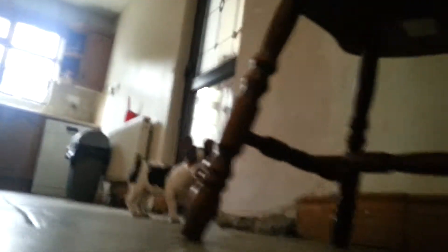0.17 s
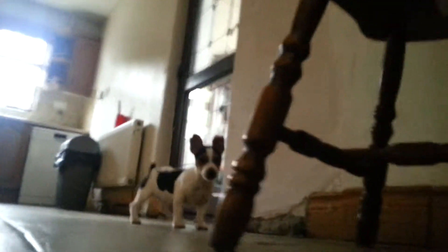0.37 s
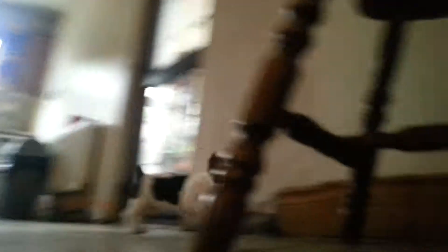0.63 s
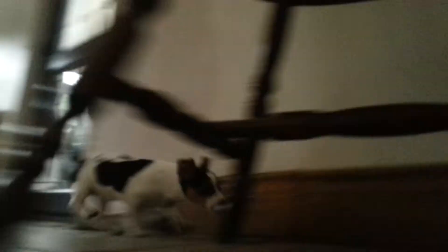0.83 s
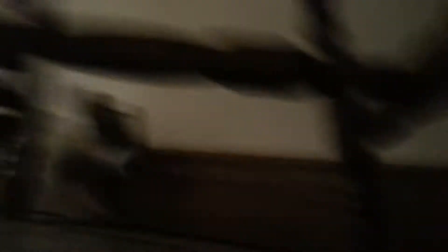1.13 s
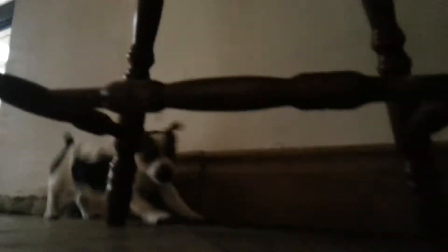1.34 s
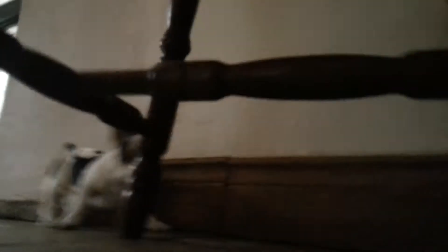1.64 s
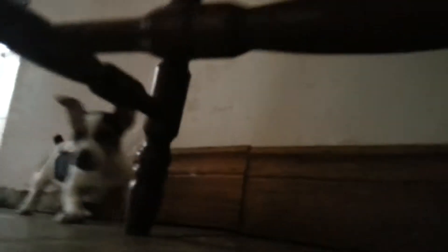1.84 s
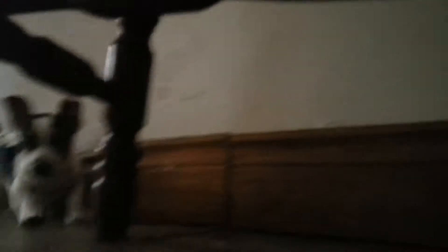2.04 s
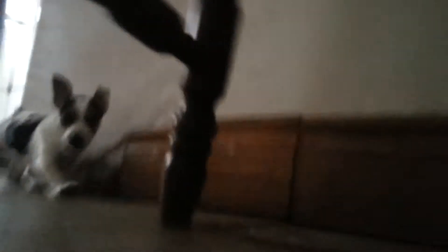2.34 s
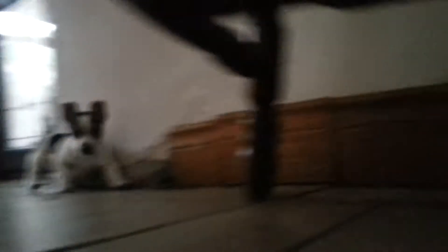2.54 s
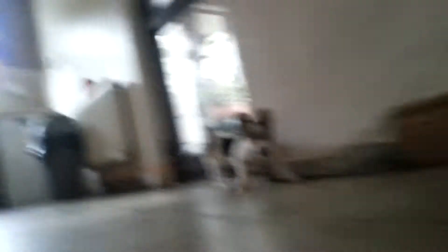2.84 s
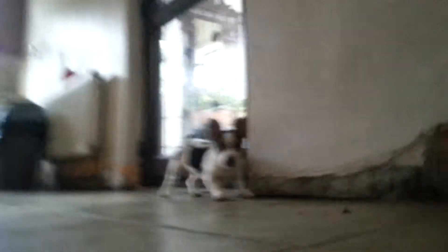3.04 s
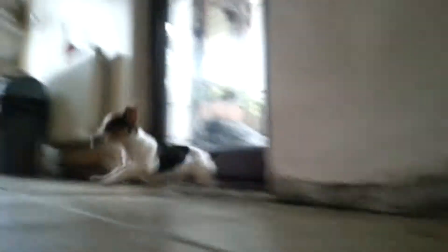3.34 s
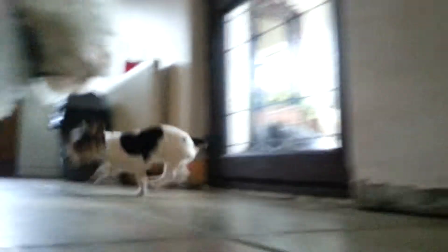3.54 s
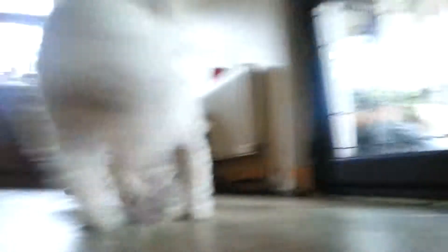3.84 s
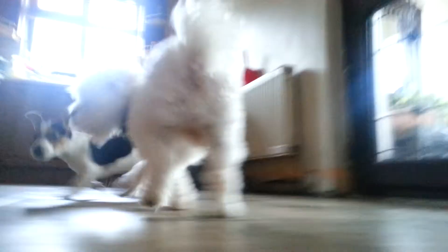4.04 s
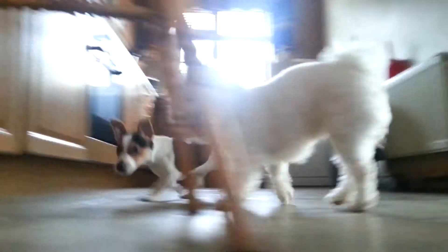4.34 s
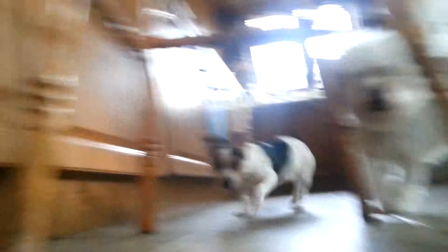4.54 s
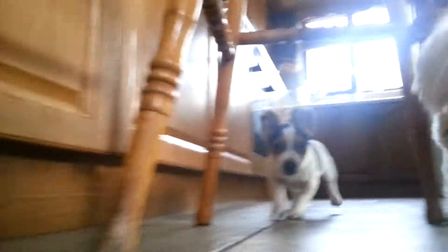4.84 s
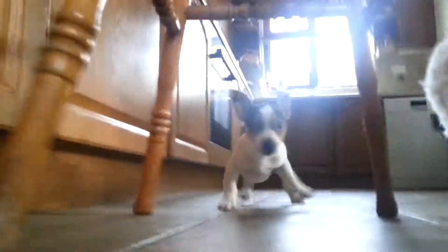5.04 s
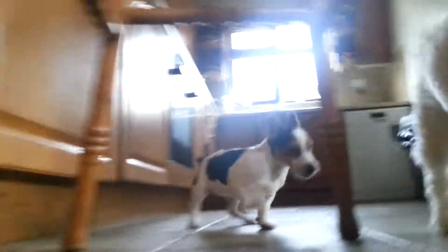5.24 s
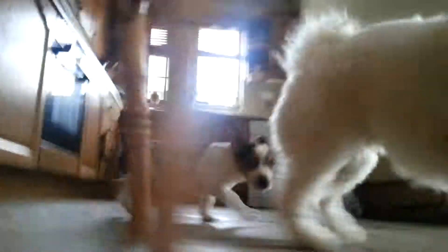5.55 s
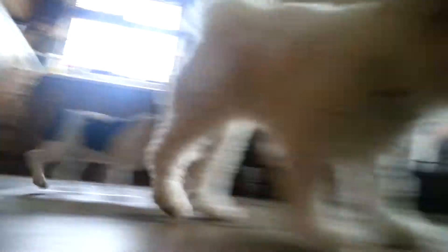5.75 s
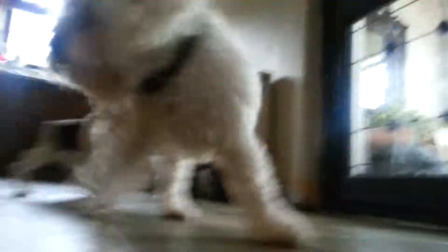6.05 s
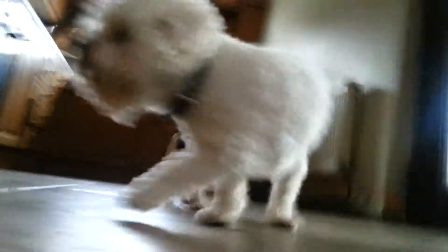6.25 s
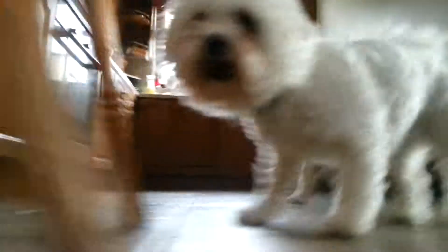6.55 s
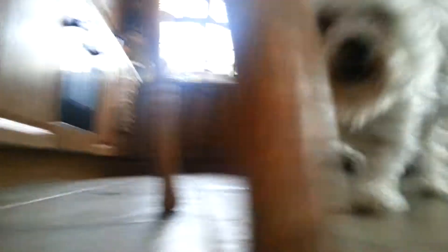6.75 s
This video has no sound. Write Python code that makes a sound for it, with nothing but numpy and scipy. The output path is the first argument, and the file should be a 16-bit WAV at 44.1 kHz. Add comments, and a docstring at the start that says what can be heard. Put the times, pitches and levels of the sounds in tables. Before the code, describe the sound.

Dog claws tick irregularly on kitchen tiles while a small plastic case scrapes and hisses along the floor, with one sharp, overloaded knock on wood.

```python
"""Plastic hisses over kitchen tiles: filtered noise for the drag, with a moving resonance in the air gap.
A small camera's case slides after dogs; scuffs and blurred tails swell as two patchy, duller noise bands.
Claws tick and paws tap as short noise puffs and dying modes, with a sparse-tap room behind them.
Once the case knocks a wooden chair leg and bounces: damped modes and bright cracks that can clip.
A faint drone, one narrow band of noise, swells and fades late on."""
import sys
import numpy as np
from scipy import signal
from scipy.fft import rfft, irfft
from scipy.io import wavfile
from scipy.ndimage import uniform_filter1d

SR = 44100
rng = np.random.default_rng(int(sys.argv[2]) if len(sys.argv) > 2 else 0)


def generate_wav(signal):
    """Clip the signal to [-1, 1] and save it as 16-bit WAV at the path in sys.argv[1]."""
    frames = np.transpose(np.atleast_2d(signal))
    scaled = np.clip(frames, -1, 1) * 32767
    pcm = np.round(scaled).astype(np.int16)
    wavfile.write(sys.argv[1], SR, pcm)


N = 304290

# How hard the case drags; it stops short at the knock and between pushes: time_s, hiss_db
DRAG_LEVEL = [(0.0, -48), (0.23, -49), (0.32, -43), (0.62, -44), (0.8, -44.5), (1.066, -36.5), (1.15, -55),
              (1.24, -43), (1.31, -40.5), (1.57, -39.5), (1.79, -44), (1.9, -40), (2.47, -45.5),
              (2.53, -35.5), (2.6, -40.5), (2.79, -48.5), (2.87, -43.5), (3.02, -55), (3.15, -43.5),
              (3.6, -39), (3.85, -45.5), (4.1, -41.5), (4.5, -39.5), (4.9, -53), (5.18, -41.5), (5.4, -42),
              (5.58, -39), (5.85, -39.5), (6.06, -43), (6.1, -54.5), (6.15, -50), (6.41, -35), (6.63, -47),
              (6.72, -40.5), (6.81, -55), (6.9, -47.5)]


def amp(db):
    """Turn decibels into an amplitude factor."""
    return 10 ** (np.asarray(db) / 20)


def evened(x):
    """Scale to rms 1 over the whole array."""
    return x / np.sqrt(np.mean(x ** 2) + 1e-20)


def read(points, hz):
    """Read a spectral curve, with straight lines over log frequency."""
    f, value = np.transpose(points)
    return np.interp(np.log(hz + 1), np.log(f + 1), value)


def glide(points, time_s):
    """Read an automation curve, with straight lines over time."""
    return np.interp(time_s, *np.transpose(points))


def add(mix, start_s, sound):
    """Mix a sound in place, cut at the end of the scene."""
    part = mix[:, round(start_s * SR):][:, :sound.shape[1]]
    part += sound[:, :part.shape[1]]


def ring(hz, db, t60_s, turns=0., size=4000):
    """One mode: a sine at a phase in turns, dying by 60 dB in t60_s."""
    t = np.arange(size) / SR
    return amp(db - 60 * t / t60_s) * np.sin(2 * np.pi * (hz * t + turns))


def burst(colour_db, t60_s, size=4000):
    """A dying puff of coloured noise of peak 1."""
    spectrum = rfft(rng.standard_normal(size))
    hiss = irfft(spectrum * amp(colour_db(np.fft.rfftfreq(size, 1 / SR))))
    puff = hiss * amp(-60 * np.arange(size) / SR / t60_s)
    return puff / abs(puff).max()


def noise(colour_db, likeness, patchy_db, flicker_db):
    """Two-port noise from random short spectra: even frame power, then random patches and flicker."""
    # Left-right tilt of the two ports: pitch_hz, left_minus_right_db
    port_tilt = [(1400, -0.5), (2400, 2.5), (4400, -3.5), (8000, -8), (15000, -3.5)]
    frames = N // 256 + 5
    hz = np.fft.rfftfreq(512, 1 / SR)[:, None]
    a, b, c, d, patches = rng.standard_normal((frames, 257, 5)).T
    patches = uniform_filter1d(patches, size=6, axis=0)  # smooth over frequency, then over time
    patches = evened(uniform_filter1d(patches, size=7, axis=1))
    gain = amp(colour_db(hz, np.arange(frames) * 256 / SR) + np.zeros(a.shape))
    gain = gain / np.sqrt((gain ** 2).mean(0))
    gain = gain * amp(patchy_db * patches + flicker_db * rng.standard_normal(frames))

    same = np.clip(likeness(hz), -1, 1)  # correlation of the ports
    left = a + 1j * b
    right = same * left + np.sqrt(1 - same ** 2) * (c + 1j * d)
    tilt = amp(read(port_tilt, hz) / 2)
    spectra = np.array([tilt * left, right / tilt]) * gain
    out = signal.istft(spectra, window="cosine", nperseg=512, noverlap=256)[1][:, :N]
    return out / np.sqrt(np.mean(out.mean(0) ** 2))  # the mono sum has rms 1


def grit(per_s, spread_db, share, last_s):
    """Grains of dirt on the tiles: random jumps of each port's level, each decaying exponentially."""
    size = amp(spread_db * np.minimum(rng.exponential(1, (2, N)), 4))
    grains = size * (rng.random((2, N)) < per_s / SR)
    decay = np.exp(-1 / (last_s * SR))
    return evened(1 + share * signal.lfilter([1], [1, -decay], grains))


def kitchen(x):
    """The room: sparse taps of random sign, one in every 20 samples, each band dying at its own speed."""
    # Room decay: pitch_hz, t60_s
    room_decay = [(200, 0.77), (600, 0.78), (2000, 0.63), (5000, 0.049), (12000, 0.02)]
    taps = np.zeros((2, SR))
    at = np.arange(200, SR - 20, 20) + rng.integers(0, 20, (2, (SR - 201) // 20))
    np.put_along_axis(taps, at, rng.choice([-1., 1.], at.shape), 1)
    hz, t, z = signal.stft(taps, SR, nperseg=256)
    fade = amp(-60 * t / read(room_decay, hz)[:, None])
    tail = signal.istft(z * fade, SR, nperseg=256)[1]
    tail = tail + 0.26 * tail[::-1]  # the ports are close, so they share part of the room
    tail = tail / np.linalg.norm(tail[0])
    return signal.fftconvolve(x.mean(0)[None], tail, axes=1)[:, :N]


def drone():
    """A low drone: a narrow band of noise, alike in both ports, that swells and fades once."""
    # Settings: start_s, end_s, pitch_hz, width_hz (between the half-amplitude points), db before the swell
    drone_settings = (5.24, 5.5, 398, 22, -48)
    start_s, end_s, pitch_hz, width_hz, db = drone_settings
    size = round((end_s - start_s) * SR)
    offset_hz = np.arange(SR // 2 + 1) - pitch_hz
    band = rfft(rng.standard_normal(SR)) / (1 + (offset_hz / width_hz * 2) ** 2)
    out = np.zeros((2, N))
    add(out, start_s, amp(db) * evened(irfft(band))[None, :size] * np.hanning(size))
    return out


def swell_level(column, fall_db_per_s, under_db, follow):
    """Each swell rises, holds and dies; their powers add to a bed that follows the drag."""
    # Swells of dull noise: scuffs, and the blurred tails of claws and of the knock:
    # start_s, rise_s (at least 2 ms is used), hold_s, body_db, edge_db
    swell_rows = [(0.0, 0.0038, 0.11, -47.5, -48.5), (0.571, 0.04, 0.031, -45.5, -54),
                  (0.713, 0.014, 0.064, -47.5, -72), (1.192, 0.025, 0.089, -36.5, -46.5),
                  (1.228, .02, 0.018, -51, -38.5), (1.875, 0.005, 0.086, -46, -56),
                  (2.562, 0.082, 0.009, -53, -43.5), (2.858, .002, .01, -46, -45.5),
                  (2.96, .002, .01, -51, -47), (3.1, .002, .17, -46.5, -49), (3.47, 0.18, 0.022, -39, -43),
                  (4.166, 0.013, 0.052, -46.5, -62), (4.36, 0.006, 0.028, -38, -59),
                  (4.559, 0.039, 0.1, -44, -57), (5.003, .004, 0.011, -46.5, -74),
                  (5.168, 0.0036, 0.11, -43.5, -51.5), (5.26, 0.038, 0.033, -40, -46),
                  (5.384, 0.004, 0.04, -40.5, -48.5), (5.823, 0.019, 0.25, -48.5, -60),
                  (6.15, 0.094, 0.12, -42, -52), (6.363, 0.035, 0.043, -67, -44.5),
                  (6.522, 0.025, 0.023, -48.5, -63)]
    t = np.arange(0, N + 64, 64) / SR
    drag_mid_db = -45  # the hiss level at which the bed sits at under_db
    power = amp(under_db + follow * (glide(DRAG_LEVEL, t) - drag_mid_db)) ** 2
    for row in swell_rows:
        start_s, rise_s, hold_s = row[0], max(row[1], .002), abs(row[2])
        rise = np.clip((t - start_s) / rise_s, 0, 1)
        falling_s = np.maximum(t - start_s - rise_s - hold_s, 0)
        power = power + (rise * amp(row[column] - fall_db_per_s * falling_s)) ** 2
    return np.interp(np.arange(N) / SR, t, np.sqrt(power))


def dull_swells():
    """Scuffs, blurred tails and the dull part of the drag: a dull body and a thinner edge, both patchy."""
    # Relative spectra of the dull body and the thin edge: pitch_hz, db_per_hz
    body_colour, edge_colour = [(180, -44), (250, -31), (320, -15.5), (420, -5.5), (620, 0.5), (820, 0),
                                (1050, 3), (1300, -2), (1800, -13), (2400, -41)], [(800, -24), (1400, -4), (2200, -4), (2900, -1), (4500, -19.5)]
    # Where a broad boost sits in each band: time_s, pitch_hz
    body_peak, edge_peak = [(0.0, 766), (1.1, 730), (1.25, 546), (1.9, 765), (3.6, 664), (4.2, 824),
                            (4.7, 746), (5.35, 850), (6.3, 850), (6.9, 750)], [(0.0, 1930), (2.6, 2260), (2.9, 2880), (3.1, 2380),
                                               (6.2, 1610), (6.9, 1430)]
    # How alike the ports are: pitch_hz, left_right_correlation (limited to -1..1)
    port_likeness = [(60, 0.39), (150, 0.055), (380, 0.77), (950, 0.11), (2370, -0.22), (5950, 0.071),
                     (14900, -1.2)]

    def boosted(colour, peak, boost_db, half_width_hz):
        def colour_db(hz, at_s):
            offset = (hz - glide(peak, at_s)) / half_width_hz
            return read(colour, hz) + boost_db / (1 + offset ** 2)
        return colour_db

    def likeness(hz):
        return read(port_likeness, hz)

    body = noise(boosted(body_colour, body_peak, 5, 130), likeness, patchy_db=1.4, flicker_db=1.6)
    edge = noise(boosted(edge_colour, edge_peak, 5, 350), likeness, patchy_db=1.5, flicker_db=0.5)
    # follow is in dB of change for each dB of hiss
    body_level = swell_level(-2, fall_db_per_s=104, under_db=-52.5, follow=0.21)
    edge_level = swell_level(-1, fall_db_per_s=103, under_db=-53.5, follow=0.43)
    both = body_level * body + edge_level * edge
    return both * grit(per_s=60, spread_db=2.5, share=0.55, last_s=.003)


def slide():
    """Wide hiss of plastic on tile, and the air gap under the case, whose pitch moves as the case tilts."""
    # Relative spectrum of the hiss: pitch_hz, db_per_hz
    hiss_colour = [(1500, -31), (3000, -1.5), (5000, 5), (7000, 3), (9000, 0), (12000, 0), (14700, -5)]
    # The air gap under the case: time_s, level_over_hiss_db, pitch_hz
    air_gap = [(0.0, -0.5, 4200), (0.35, -5.5, 4350), (0.85, -0.5, 4400), (1.15, -9, 4430),
               (1.27, 4.5, 3650), (1.33, -5, 4070), (2.53, -4, 3470), (2.63, 3.5, 4280), (2.88, -11, 3230),
               (3.14, -3.5, 4400), (3.6, -1.5, 3620), (3.9, -2, 3650), (4.13, 5, 4050), (4.27, 0.5, 3740),
               (4.46, 3, 4080), (4.5, -4, 3660), (4.68, 2.5, 3300), (5.18, 0, 3880), (5.55, -5.5, 3920),
               (6.3, -5.5, 4000), (6.9, -0.5, 3740)]
    # Which port is nearer the floor: time_s, left_minus_right_db
    port_lean = [(1.3, 7), (1.47, 4.5), (3.92, 4), (4.12, 5.5), (6.49, 3), (6.9, 5)]
    gap_s, over_db, gap_hz = np.transpose(air_gap)
    t = np.arange(N) / SR

    def gap_colour(hz, at_s):
        offset = (hz - np.interp(at_s, gap_s, gap_hz)) / 400
        return -12 * np.log10(1 + offset ** 2)

    hiss = noise(lambda hz, at_s: read(hiss_colour, hz), lambda hz: 0 * hz, patchy_db=2.0, flicker_db=0.8)
    gap = noise(gap_colour, lambda hz: 0.17 + 0 * hz, patchy_db=1.5, flicker_db=1.0)
    both = amp(glide(DRAG_LEVEL, t)) * (hiss + amp(np.interp(t, gap_s, over_db)) * gap)
    leaning = amp(glide(port_lean, t) * np.array([[.5], [-.5]]))
    return both * leaning * grit(per_s=110, spread_db=3.5, share=0.22, last_s=.0009)


def claws():
    """A bright tick and a short paw tap, each at its own pitch; a second nail lands a few ms later."""
    # Before panning: start_s, nail_peak_db, nail_pitch_hz, tap_db (rms of its first 10 ms), tap_pitch_hz,
    # left_minus_right_db
    claw_steps = [(0.2582, -26, 1950, -52, 939, -4), (0.4131, -32, 3000, -45, 945, 4),
                  (0.7251, -25, 4710, -40, 820, 2), (0.7568, -33, 4530, -41, 787, 2.0),
                  (0.8994, -29, 4520, -43.5, 750, 8), (1.2582, -22.5, 2610, -37, 536, -3),
                  (1.3354, -26, 3960, -37, 674, 1.5), (1.3722, -20, 1400, -35, 660, 1),
                  (1.4098, -21, 1170, -34, 610, -1), (1.4366, -17, 2100, -39, 540, -1),
                  (1.4638, -18, 2000, -35, 620, -1.0), (1.4915, -18, 2900, -37, 700, -1.0),
                  (1.8785, -24, 2500, -48, 710, 2), (1.8833, -17, 3400, -40, 800, -3),
                  (2.499, -29, 3930, -61, 980, 6), (2.6493, -24.5, 4500, -43, 870, 5),
                  (2.8578, -22, 1900, -39, 800, 2), (2.8705, -28, 2900, -50, 800, 2),
                  (2.9601, -26.5, 1900, -48, 900, 1.5), (2.9628, -29, 2980, -38, 800, 1.5),
                  (3.1008, -27, 1800, -42, 930, 0), (3.107, -30, 1300, -44, 900, 0),
                  (3.2975, -23, 3500, -53, 770, 1), (4.1603, -21, 3900, -43, 1050, 2),
                  (4.3975, -18, 4050, -50, 774, 2), (4.407, -22, 3300, -50, 800, 2),
                  (4.4244, -20, 4300, -45, 800, 0), (4.4665, -14, 4000, -49, 660, 2.0),
                  (4.5968, -30, 3250, -39, 805, 3), (5.0085, -41, 3560, -46.5, 855, 5),
                  (5.167, -34, 3850, -43, 950, -2), (5.3755, -28, 1100, -38, 800, 0),
                  (5.58, -27, 3300, -55, 1210, 0), (5.8697, -25, 3500, -46, 800, 0),
                  (6.2432, -28, 1500, -45, 920, 0), (6.282, -36, 1000, -41, 700, 0),
                  (6.43, -29, 1400, -50, 800, 0)]
    # Relative spectrum of nail on tile: multiple_of_nail_pitch, db_per_hz
    tick_colour = [(.25, -15), (.6, -8), (1, 3), (1.7, 2), (2.5, -8), (6, -21)]
    nail_t60_s, paw_t60_s = .006, .016
    nail_cycles = 18  # cycles for a nail mode to die by 60 dB
    out = np.zeros((2, N))
    chance = rng.uniform(0, 1, (len(claw_steps), 2))
    soft = np.minimum(np.arange(4000) / 50, 1)  # the pad lands over a millisecond

    def nail(nail_hz):
        tick = .5 * burst(lambda f: read(tick_colour, f / nail_hz), nail_t60_s)
        modes = sum(ring(k * nail_hz, -6 * k, nail_cycles / nail_hz / k) for k in (1, 1.32, 1.75))
        return tick + modes

    for (start_s, nail_db, nail_hz, tap_db, tap_hz, pan_db), (late, weak) in zip(claw_steps, chance):
        pan = amp([[pan_db / 2], [-pan_db / 2]])
        paw = soft * (ring(tap_hz, 0, paw_t60_s) + ring(tap_hz * 1.9, -8, paw_t60_s))
        first, second = nail(nail_hz), nail(nail_hz)
        add(out, start_s, pan * amp(nail_db) * first / abs(first).max())
        add(out, start_s + .0007, pan * amp(tap_db) * paw / paw[:SR // 100].std())
        add(out, start_s + .0015 + .002 * late, pan * amp(nail_db - 5 - 8 * weak) * second)
    return out


def knock():
    """The first blow rings the chair leg; every blow rings the damped case and adds a bright crack."""
    # The knock and its bounces, as gains: start_s, case_left_db, case_right_db, crack_db
    blow_times = [(1.1594, -5, 2, 10), (1.1652, -16, -9, -16), (1.1670, -18, -7, -9),
                  (1.1759, -20, -8, -12), (1.1843, -24, -11, -29), (1.1924, -26, -17, -40),
                  (1.2040, -26, -22, -38), (1.2080, -28, -23, -38)]
    # Modes of the chair leg: pitch_hz, left_db, right_db, t60_s
    wood_modes = [(162, -1, -4, 0.089), (541, -25.5, -24, 0.58), (828, -27, -14, 0.072)]
    # Modes of the plastic case, before the blow's gain: pitch_hz, left_db, right_db, right_phase_lead_turns
    case_modes = [(423, 2, 2.5, 0.24), (720, -26, 6, 0.65), (910, 7, 5.5, 0.2), (1530, -41, -4.5, 0.94),
                  (1880, 9.5, 10, 0.24), (2640, 5, -13, 0.25)]
    # Relative crack spectrum, each port then scaled to peak 1: pitch_hz, left_db, right_db
    crack_colour = np.array([(1500, -25, -42), (3800, 6, 9), (5130, -12, -2), (6260, -5, 3), (7600, 9, 7),
                             (9200, 5, 5), (13300, -3.5, -12)])
    case_cycles, crack_t60_s = 9, .0055  # cycles for a case mode to die by 60 dB

    case = np.zeros((2, 20000))
    for hz, left_db, right_db, turns in case_modes:
        case[0] += ring(hz, left_db, case_cycles / hz, size=20000)
        case[1] += ring(hz, right_db, case_cycles / hz, turns, size=20000)
    case[:, :30] *= np.linspace(0, 1, 30)  # the blow takes most of a millisecond to build
    wood = sum(ring(hz, np.array([[left_db], [right_db]]), t60_s, size=20000)
               for hz, left_db, right_db, t60_s in wood_modes)
    crack_rise = np.minimum(np.arange(4000) / 35, 1)

    out = np.zeros((2, N))
    add(out, blow_times[0][0], wood)
    for start_s, left_db, right_db, crack_db in blow_times:
        crack = [burst(lambda f: read(crack_colour[:, [0, port]], f), crack_t60_s) for port in (1, 2)]
        add(out, start_s, amp([[left_db], [right_db]]) * case)
        add(out, start_s, amp(crack_db) * crack_rise * np.array(crack))
    return out


def scene():
    """Sum the sources; only the claws and the knock excite the room."""
    steps, blow = claws(), knock()
    to_room = amp(-10) * steps + amp(-21.5) * blow
    return slide() + dull_swells() + drone() + steps + blow + kitchen(to_room)


def record(dry):
    """A steep high-pass thins the bass, the converter clips hard, then the band is limited."""
    thin = signal.sosfilt(signal.butter(6, 280, "high", fs=SR, output="sos"), dry)
    clipped = np.clip(thin, -1, 1)
    lowpass = signal.firwin(511, 14800, window=("kaiser", 9), fs=SR)
    limited = signal.oaconvolve(clipped, lowpass[None], "same")
    return np.clip(limited, -1, 1)


dry = scene()
out = record(dry)
generate_wav(out)
```